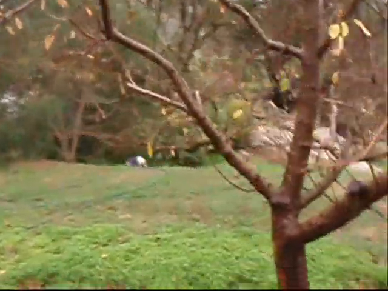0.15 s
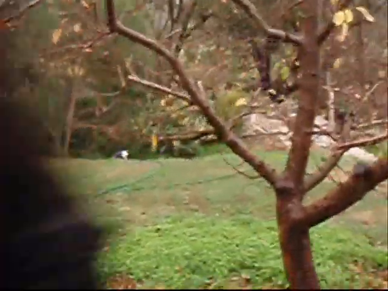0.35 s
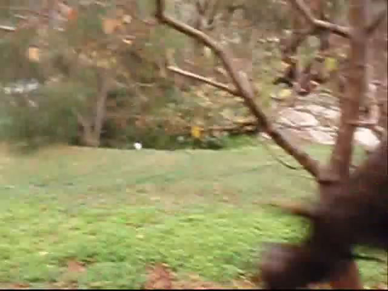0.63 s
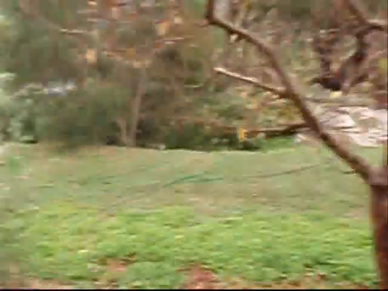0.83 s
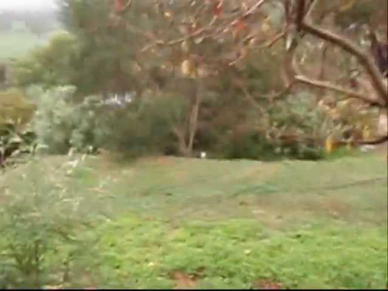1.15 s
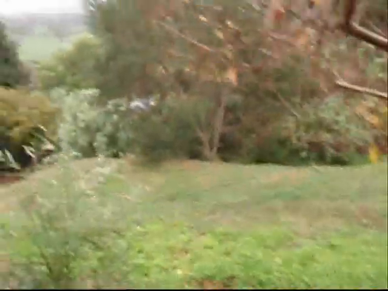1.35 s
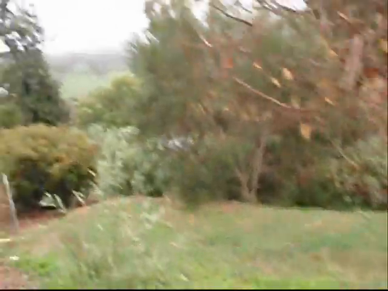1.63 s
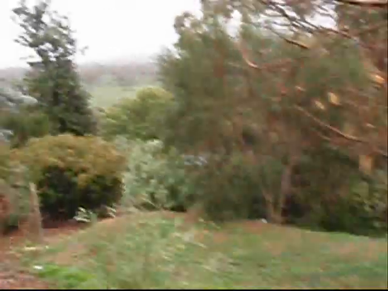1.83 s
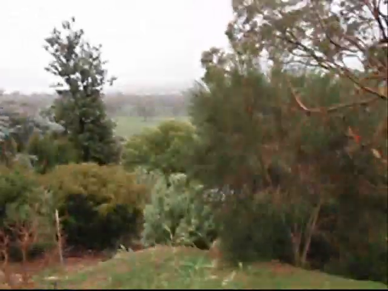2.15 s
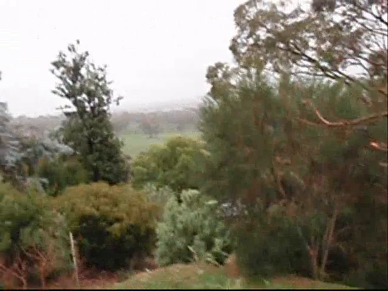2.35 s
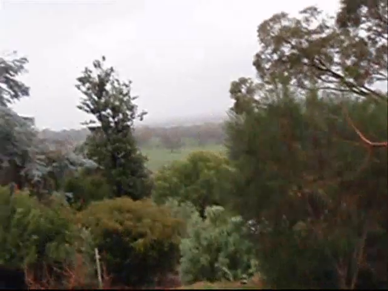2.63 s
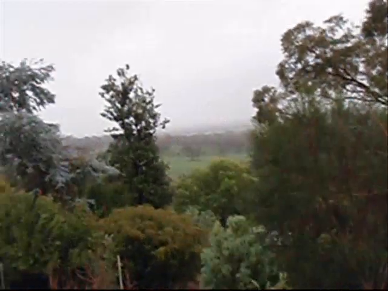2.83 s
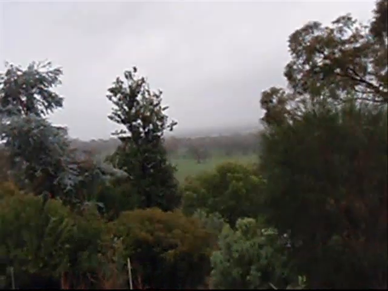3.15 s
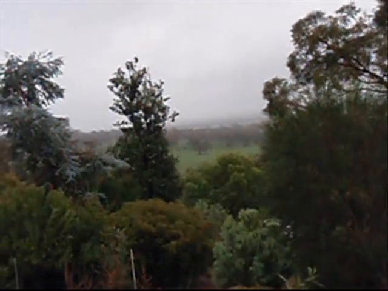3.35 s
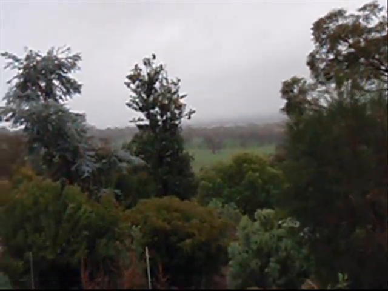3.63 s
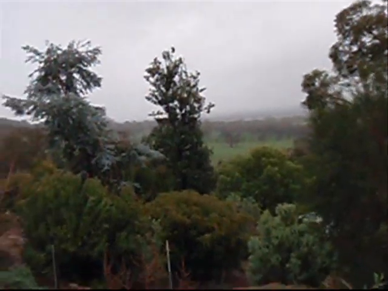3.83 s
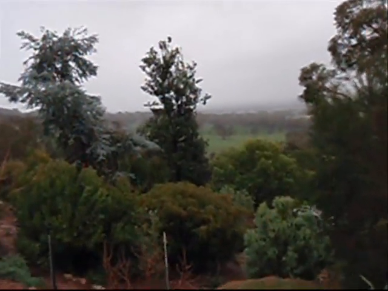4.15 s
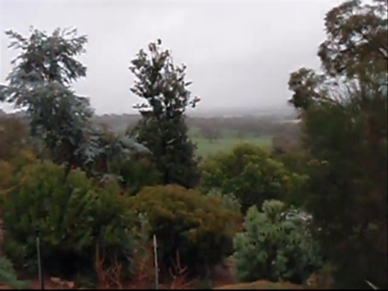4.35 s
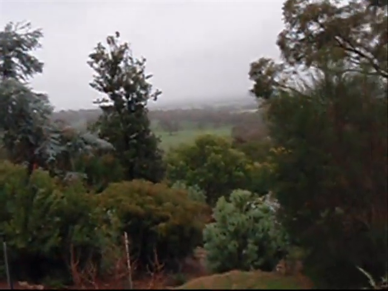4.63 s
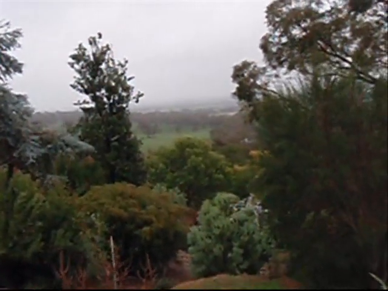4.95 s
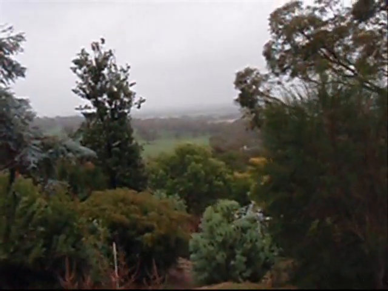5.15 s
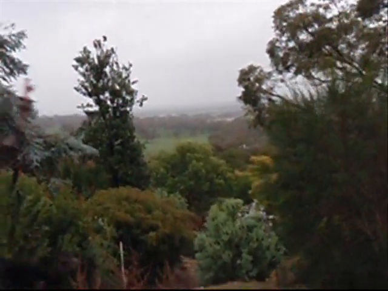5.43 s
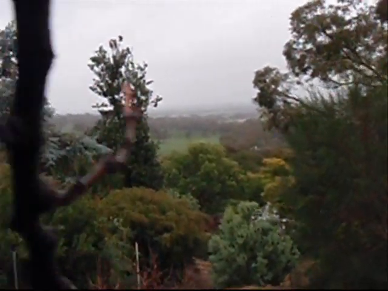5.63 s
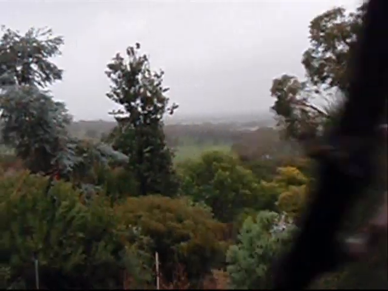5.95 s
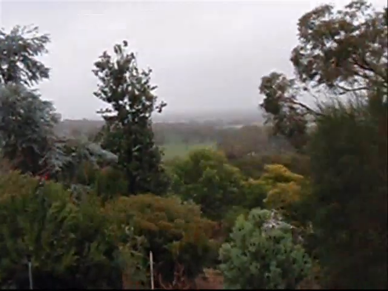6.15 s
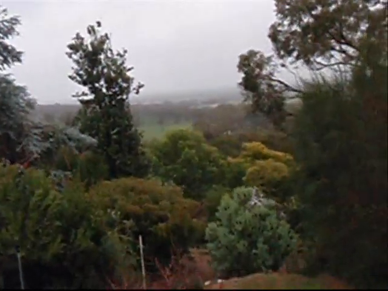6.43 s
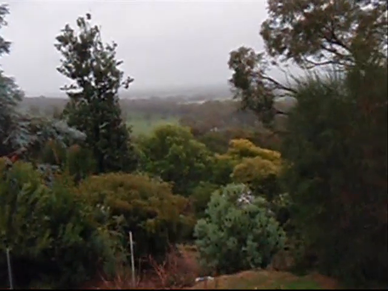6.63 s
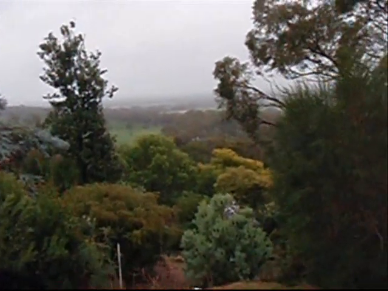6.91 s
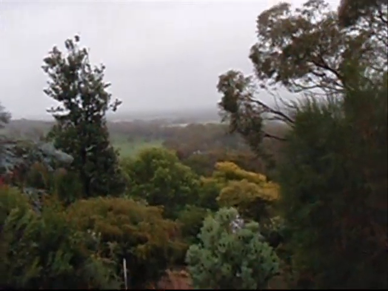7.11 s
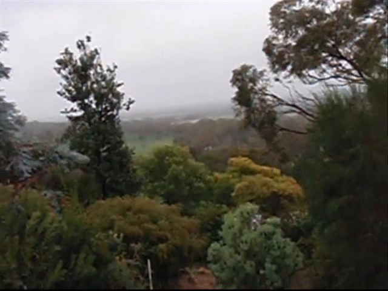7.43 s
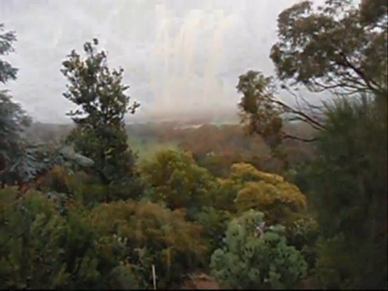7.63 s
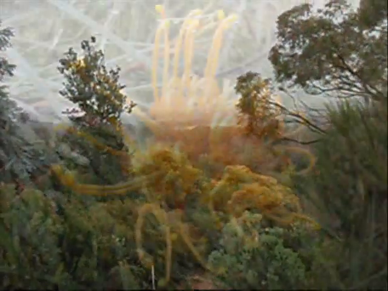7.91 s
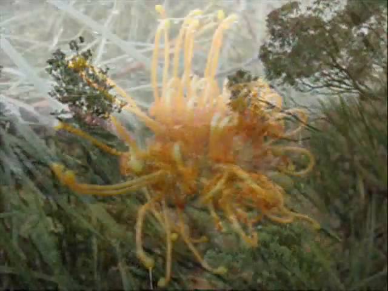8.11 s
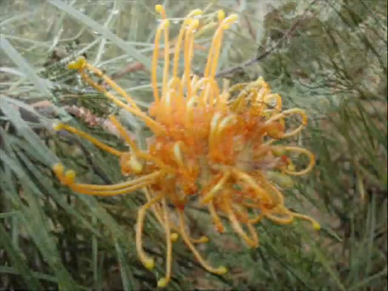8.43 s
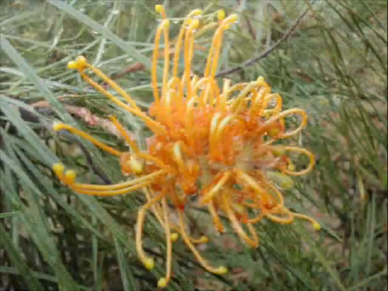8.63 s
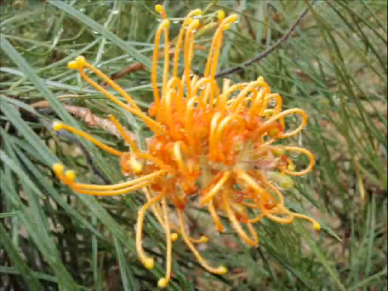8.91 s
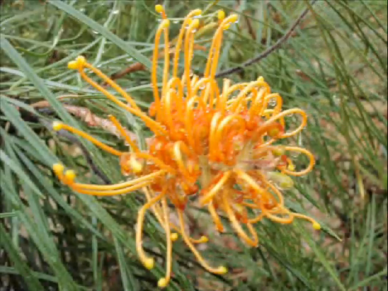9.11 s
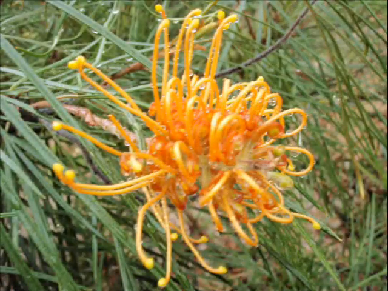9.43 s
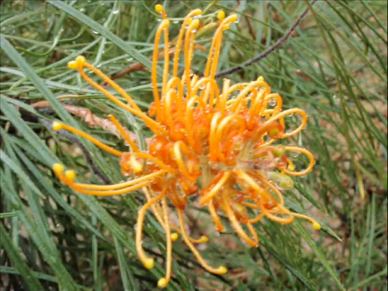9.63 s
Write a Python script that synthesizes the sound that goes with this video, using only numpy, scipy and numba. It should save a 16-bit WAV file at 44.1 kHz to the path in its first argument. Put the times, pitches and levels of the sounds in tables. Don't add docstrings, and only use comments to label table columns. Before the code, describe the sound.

Steady rain on foliage through a crude little camera microphone: crackling patter, random hard drips, a faint low wash, then a fade.

```python
import sys
import numpy as np
from scipy import signal
from scipy.fft import rfft, irfft
from scipy.io import wavfile
from scipy.ndimage import uniform_filter1d
from numba import njit

SR = 44100
rng = np.random.default_rng(int(sys.argv[2]) if len(sys.argv) > 2 else 0)


def materialize(psi):
    bounded = np.clip(np.atleast_2d(psi).T, -1, 1)
    quanta = np.round(bounded * 32767).astype(np.int16)
    wavfile.write(sys.argv[1], SR, quanta)


def attenuation_scalar(level_db):
    decades = np.asarray(level_db, float) / 20
    return 10 ** decades


N = 430852

# time_s, level_db
SHOWER = [(0.02, -35), (0.4, -36.5), (1.25, -36.5), (1.45, -36), (2.3, -35.5), (2.65, -35), (3.2, -35.5),
          (4.4, -35), (4.65, -36), (5.2, -35.5), (5.9, -36.5), (6.25, -35.5), (6.8, -37.5), (7.05, -35.5),
          (7.8, -38), (8.2, -38), (8.5, -39), (9.04, -38.5)]
# mid_s, lift_db, half_length_ms
FLURRIES = [(0.003, 10.5, 6.1), (0.181, 7, 7), (0.385, 3.5, 25), (0.7, 4, 6), (2.44, 3, 16),
            (0.927, 2.5, 5), (1.07, 3, 32), (1.689, 1.5, 4.8), (1.725, 2.5, 20.5), (1.841, -3, 6),
            (2.103, 3.5, 13), (2.644, 4, 4), (4.014, 3.5, 8), (3.897, 4, 7.4), (4.152, 5, 9.3),
            (4.442, 8.5, 16), (4.493, 5, 4), (4.604, 2, 16), (4.678, 0, 12.5), (5.281, 1, 11.3),
            (5.641, 0, 3.1), (5.981, 3, 5), (6.041, 3.5, 12.3), (6.185, 6, 16.6), (6.811, 2.5, 14),
            (7.085, 1, 15), (8.045, 4, 25), (8.066, 9.5, 14), (0.02, 5.5, 5), (8.927, 8, 4.2)]
# start_s, dip_db
DIPS = [
    (6.309, -5),
    (8.932, -3.5),
]
# freq_hz, density_db_per_hz
LEAVES = [(290, -40.5), (500, -12.5), (892, -12), (1110, -10), (2140, -3), (2540, -5), (3620, 1.5),
          (3950, 1.5), (5140, -35.5), (8690, -120)]
# mid_s, peak_db, half_length_ms
SMACKS = [(0.0015, -17.5, 0.47), (0.0179, -14.5, 0.33), (0.1631, -18, 0.68), (0.1655, -17, 0.21),
          (0.6035, -12.5, 0.16), (0.7006, -11.5, 0.16), (0.715, -13, 0.22), (1.1407, -10, 0.18),
          (1.3791, -10.5, 0.48), (1.3967, -18, 0.31), (1.403, -17, 0.28), (1.45, -15.5, 0.22),
          (1.725, -15.5, 0.3), (2.1015, -17, 0.21), (2.6764, -20, 0.35), (2.9428, -9, 0.14),
          (3.4787, -15, 0.33), (3.734, -14, 0.23), (4.4397, -18, 0.22), (5.2152, -11, 0.15),
          (5.4167, -17.5, 0.39), (5.5817, -18.5, 0.28), (5.9762, -6.5, 0.16), (5.9831, -20, 0.25),
          (6.16, -17.5, 0.29), (6.3056, 1.5, 0.23), (4.4349, -12, 0.24), (8.0581, -16.5, 0.25),
          (8.0903, -17.5, 0.17), (8.9262, -9, 0.38)]
# mid_s, peak_db
TICKS = [(0.066, -20), (0.1883, -20), (5.2786, -16.5), (0.474, -21), (0.578, -21), (0.6605, -21),
         (0.769, -18), (0.7946, -16), (0.8518, -19.5), (0.996, -23), (1.0544, -22), (1.0851, -21),
         (1.2882, -22), (1.515, -18.5), (1.568, -20), (1.6776, -20), (1.8395, -20.5), (2.6428, -28),
         (2.7382, -22.5), (3.369, -21), (3.7697, -19), (3.8218, -25), (3.8949, -21), (4.0084, -18),
         (4.0234, -22), (4.852, -24), (5.0715, -24), (6.6758, -23), (8.0723, -13.5), (8.084, -19)]
# mid_s, peak_db, ring_hz, half_length_ms
PINGS = [(0.2308, -27, 2450, 0.93), (0.565, -25.5, 2640, 2), (1.275, -37, 2520, 2.9), (1.583, -37, 1560, 3),
         (2.2172, -22, 2900, 0.8), (3.0124, -31.5, 2980, 1.6), (3.085, -30.5, 2430, 1.1),
         (3.209, -23, 2880, 1.1), (3.213, -33.5, 2510, 7.6), (3.238, -35, 2480, 2.4),
         (3.5147, -32.5, 2870, 2), (3.7021, -36, 2160, 5.8), (4.0125, -26, 2990, 1.7),
         (4.5185, -29.5, 2760, 2.4), (4.5899, -34, 2780, 1.9), (4.6016, -35.5, 1660, 4.1),
         (4.6776, -29.5, 2790, 2.8), (5.1335, -30, 2680, 1.4), (5.595, -35.5, 2660, 5),
         (5.6655, -30, 2710, 1.7), (6.2896, -30, 2770, 3.5), (6.415, -35, 1865, 5),
         (6.6448, -39.5, 2700, 1.4), (6.996, -38, 2350, 3), (7.5575, -38, 1800, 1.1),
         (7.709, -33, 2920, 0.98), (8.0725, -44, 790, 5.3), (8.125, -45, 1580, 6.2),
         (8.4299, -40, 2170, 2.6), (8.633, -41, 2500, 2.5)]
# mid_s, peak_db, centre_hz, half_length_ms
THUDS = [(0.0011, -24.5, 746, .5), (0.161, -21, 2000, 0.22), (0.1994, -31.5, 151, 1),
         (0.348, -29, 2720, 0.36), (0.7146, -40, 2030, .2), (0.7666, -26, 2460, 0.28),
         (0.8258, -22, 2560, 0.37), (1.1408, -29, 1880, 0.17), (1.3793, -29, 540, .25),
         (1.5496, -28, 2700, .6), (1.9242, -37, 540, 0.22), (2.1008, -24.5, 550, 0.34),
         (2.118, -32, 700, .35), (2.627, -36, 1510, 0.54), (2.9428, -29, 1900, .15),
         (3.2216, -25, 2630, .5), (4.1582, -30, 1700, .15), (4.377, -15.5, 1600, 0.16),
         (4.435, -23, 540, 0.25), (4.4398, -24.5, 1320, .3), (5.5812, -25, 1700, 0.16),
         (5.976, -29, 1880, .15), (3.2063, -17.5, 2650, 0.47), (6.3056, -23, 298, 0.43),
         (6.4608, -31, 1240, 0.27), (7.4554, -18, 2740, .15), (8.375, -28, 2480, .2),
         (8.471, -30, 1530, .4), (5.1428, -31, 2700, .8), (8.9265, -32, 900, 0.22)]
# freq_hz, density_db_per_hz
RUMBLE = [(26, -31), (45, -7), (53, -6.5), (139, 0), (430, -5.5), (1000, -6), (1300, -34), (2200, -120)]
# start_s, end_s
FADE_S = (7.87, 9.084)

RECOVER_S = 0.3
TICK_HZ, TICK_HALF_MS = 3673, 0.3
STRAY_DB, SPLASH_DB = 9, 7.5
ECHO_MS, ECHO_DB = 1.5, -13
RUMBLE_DB, RUMBLE_DRIFT_DB, RUMBLE_FOLLOWS_DB_PER_DB = -24.5, 0.85, 0.69
DRONE_HZ = 164.3
CAMERA_HZ, STEPS = 8001.5, 128
CUT_S = 9.052


def shower():
    swell = flurries() * attenuation_scalar(0.5 * walk(25))
    hiss = unit(colour(rng.standard_normal(N), LEAVES)) * attenuation_scalar(0.6 * walk(40)) * swell ** 0.53
    clicks = patter(count=8000, scatter_db=0.0) * attenuation_scalar(1.2 * walk(30)) * swell
    crackle = tinkle(count=3000, low_hz=3137, high_hz=3894, half_s=0.00028, scatter_db=3.0)
    crackle = crackle * swell ** 1.3
    ring = tinkle(count=1500, low_hz=901.0, high_hz=3813, half_s=0.002, scatter_db=2.0)
    mix = attenuation_scalar(-3) * hiss + attenuation_scalar(-4.5) * clicks + attenuation_scalar(-6.5) * crackle + attenuation_scalar(-11.5) * ring
    return attenuation_scalar(rain_db(np.arange(N) / SR)) * mix


def patter(count, scatter_db):
    when, rarity, side = rng.random((count, 3)).T
    clicks = np.zeros(N)
    size = attenuation_scalar(-scatter_db * np.log(rarity + 0.0045))
    np.add.at(clicks, (when * N).astype(int), size * np.sign(side - 0.5))
    return unit(colour(clicks, LEAVES))


def tinkle(count, low_hz, high_hz, half_s, scatter_db):
    when, pitch, length, rarity, phase = rng.random((count, 5)).T
    hz = low_hz * (high_hz / low_hz) ** np.sqrt(pitch)
    size = attenuation_scalar(-scatter_db * np.log(rarity + 0.0083))
    half_s = half_s * (0.3 + length)
    return unit(rings(when * N / SR, hz, half_s, size, phase, rise=0.45, fall=1.8, glide=0.004))


def flurries():
    t, db = np.arange(0, N, 32) / SR, 0
    for mid_s, lift_db, half_ms in FLURRIES:
        u = 1000 * (t - mid_s) / max(half_ms, 2)
        shape = np.exp(-(u / np.where(u < 0, 0.45, 1.6)) ** 2 / 2)
        db = np.maximum(db, lift_db * shape)
    return attenuation_scalar(np.interp(np.arange(N) / SR, t, db))


def rain_db(t):
    s, db = np.transpose(SHOWER)
    return np.interp(t, s, db) + ducking_db(t)


def ducking_db(t):
    return sum(db * np.exp(-np.abs(t - s) / RECOVER_S) * (t > s) for s, db in DIPS)


def ticks():
    light = [(s, db, TICK_HALF_MS) for s, db in TICKS]
    s, db, half_ms = np.vstack([SMACKS, light, strays(count=35), splashes(count=2)]).T
    pitch, side, phase = rng.random((len(s), 3)).T
    s = np.round(s * CAMERA_HZ) / CAMERA_HZ
    hz = TICK_HZ * (1 + 0.085 * (pitch - 0.5))
    half_s = np.clip(half_ms, 0.1, 2) / 1000
    echo = rings(s + ECHO_MS / 1000, hz, 1.3 * half_s, attenuation_scalar(db + ECHO_DB), phase,
                 rise=0.73, fall=1.3, glide=0.0037)
    crest = np.round(side) / 2 + 0.11 * (phase - 0.5)
    return echo + rings(s, hz, half_s, attenuation_scalar(db + 0.5), crest, rise=0.87, fall=1.3, glide=0.0047)


def strays(count):
    when, level, length = rng.random((count, 3)).T
    s = when * CUT_S
    db = rain_db(s) + STRAY_DB + 4 * level
    return np.transpose([s, db, TICK_HALF_MS * (0.91 + 0.71 * length ** 2)])


def splashes(count):
    mid_s, lift_db, half_ms = np.repeat(FLURRIES, count, axis=0).T
    when, level, length = rng.random((len(mid_s), 3)).T
    s = np.abs(mid_s + half_ms / 1000 * (3.7 * when - 0.9))
    db = rain_db(s) + SPLASH_DB + 0.64 * lift_db + 4 * level
    return np.transpose([s, db, TICK_HALF_MS * (0.7 + 1.1 * length ** 2)])


def pings():
    ring = push_pull(PINGS, gain_db=3.0, rise=0.5, fall=1.7, glide=0.001)
    return ring * attenuation_scalar(3.0 * walk(600))


def thuds():
    return push_pull(THUDS, gain_db=3.5, rise=0.93, fall=1.1, glide=0.002)


def push_pull(table, gain_db, rise, fall, glide):
    s, db, hz, half_ms = np.transpose(table)
    half_s = np.clip(half_ms, 0.1, 15) / 1000
    quarter_turn = np.full(len(s), 1 / 4)
    return rings(s, hz, half_s, attenuation_scalar(db + gain_db), quarter_turn, rise, fall, glide)


def rumble():
    wash = attenuation_scalar(1.2 * walk(9)) * unit(colour(rng.standard_normal(N), RUMBLE))
    drone = unit(signal.lfilter(*signal.iirpeak(DRONE_HZ, 25, fs=SR), rng.standard_normal(N)))
    follow_db = RUMBLE_FOLLOWS_DB_PER_DB * rain_db(np.arange(N) / SR)
    level = attenuation_scalar(RUMBLE_DB + RUMBLE_DRIFT_DB * walk(2) + follow_db)
    return level * (wash + attenuation_scalar(-15.0) * drone)


@njit
def rings(when_s, hz, half_s, size, phase, rise, fall, glide):
    out = np.zeros(N)
    for k in range(len(when_s)):
        mid, half = int(when_s[k] * SR), half_s[k] * SR
        for i in range(max(-int(4 * half), -mid), min(int(6 * half), N - mid)):
            u = i / (half * (rise if i < 0 else fall))
            turn = hz[k] * i / SR * (1 + glide * i / half) + phase[k]
            out[mid + i] += size[k] * np.exp(-u * u / 2) * np.cos(2 * np.pi * turn)
    return out


def unit(x):
    return x / np.sqrt(np.mean(x ** 2))


def colour(x, points):
    size = 4096
    hz, db = np.transpose(points)
    bins_hz = np.fft.rfftfreq(size, 1 / SR)
    log_gain = np.interp(np.log(bins_hz + 1), np.log(hz), db) * np.log(10) / 20
    cepstrum = irfft(log_gain)
    cepstrum[1:size // 2] *= 2
    cepstrum[size // 2 + 1:] = 0
    return signal.fftconvolve(x, irfft(np.exp(rfft(cepstrum))))[:N]


def walk(rate_hz):
    k = int(SR / rate_hz)
    held = np.repeat(rng.standard_normal(N // k + 1), k)
    return unit(uniform_filter1d(uniform_filter1d(held, k), k)[:N])


def scene():
    return (shower() + ticks() + pings() + thuds() + rumble())[None]


def low_pass(x):
    return signal.sosfilt(signal.butter(12, 17160, fs=SR, output="sos"), x)


def record(dry):
    guard = signal.butter(7, 4230, fs=SR, output="sos")
    guarded = signal.sosfiltfilt(guard, dry[0])
    step = np.floor(np.arange(N) * CAMERA_HZ / SR)
    taken = np.interp(step * SR / CAMERA_HZ, np.arange(N), guarded)
    held = np.floor(np.clip(taken, -0.8, 0.8) * STEPS) / STEPS
    t = np.arange(N) / SR
    start_s, end_s = FADE_S
    fade = np.clip((end_s - t) / (end_s - start_s), 0, 1) * (t < CUT_S)
    top = signal.ellip(10, 0.15, 36, 15750, fs=SR, output="sos")
    mix = signal.sosfiltfilt(top, held * fade)[None]
    return low_pass(mix)


dry = scene()
out = record(dry)
materialize(out)
```